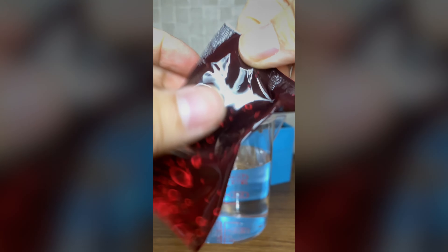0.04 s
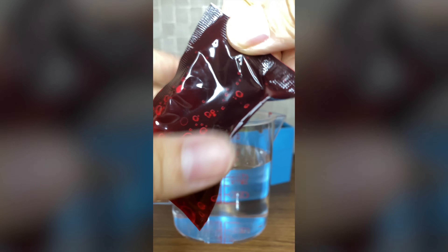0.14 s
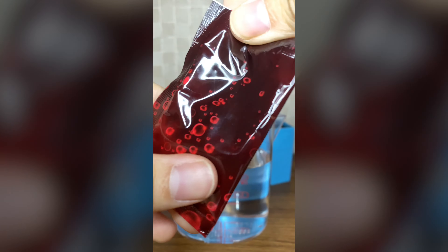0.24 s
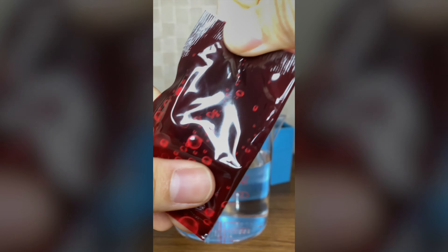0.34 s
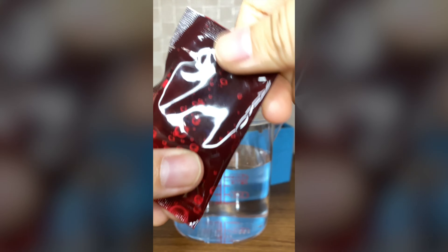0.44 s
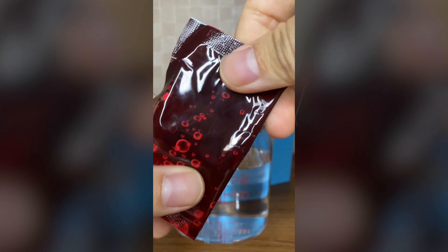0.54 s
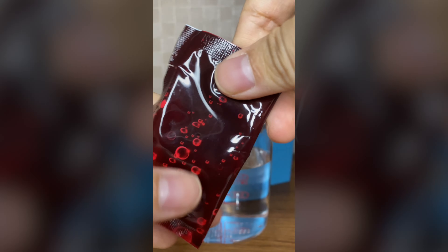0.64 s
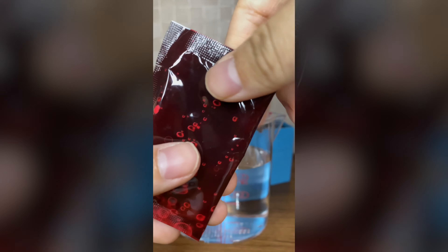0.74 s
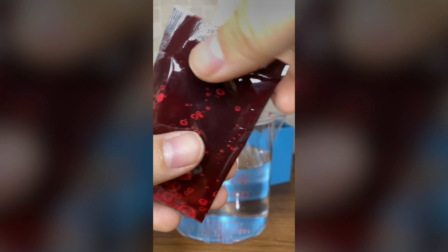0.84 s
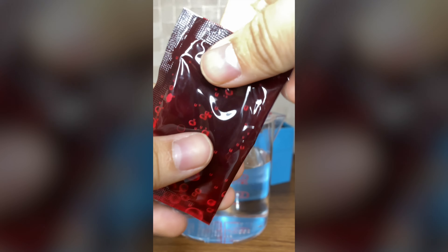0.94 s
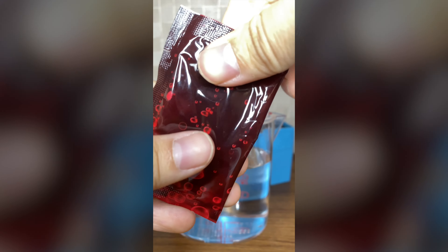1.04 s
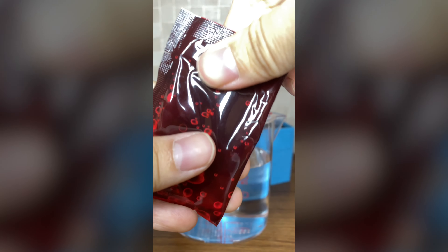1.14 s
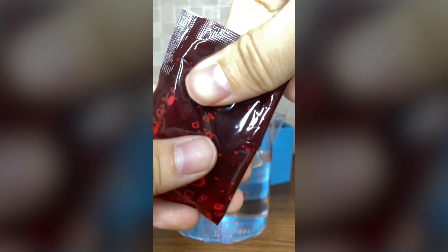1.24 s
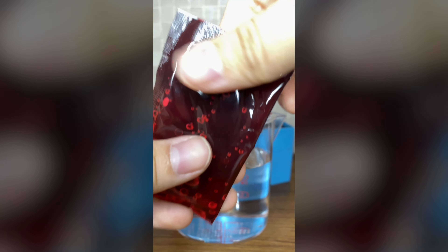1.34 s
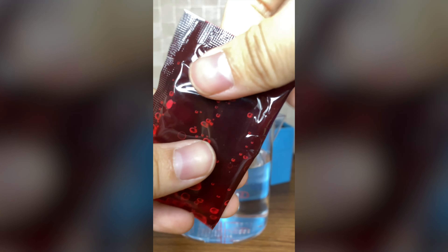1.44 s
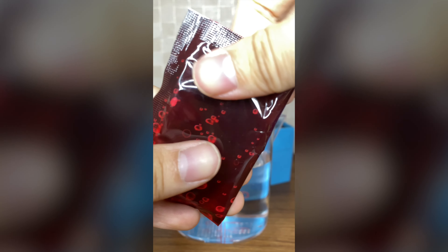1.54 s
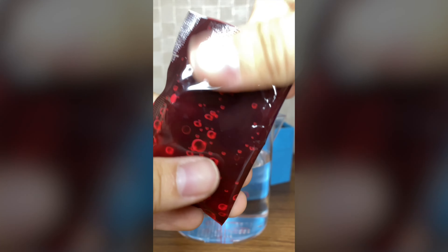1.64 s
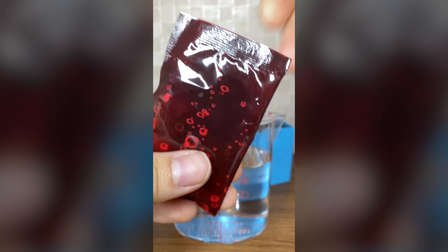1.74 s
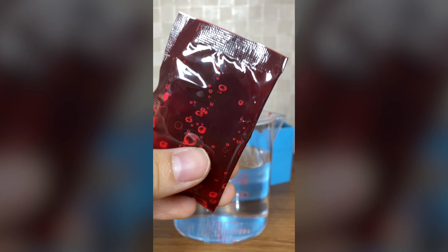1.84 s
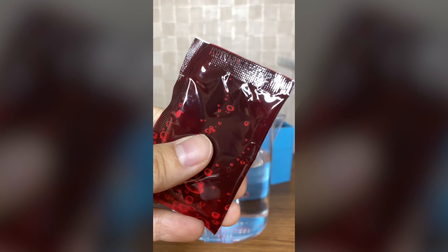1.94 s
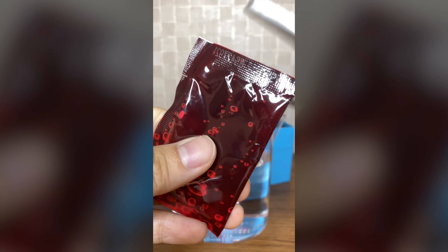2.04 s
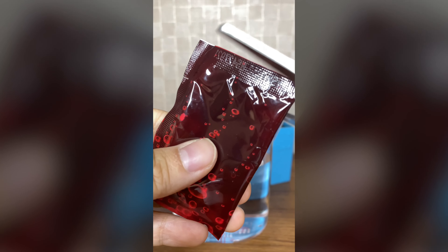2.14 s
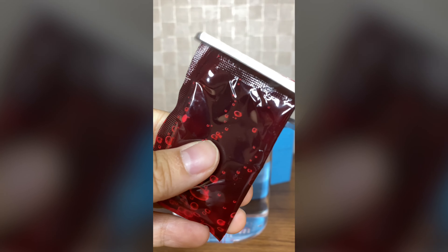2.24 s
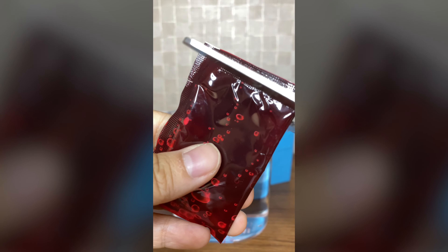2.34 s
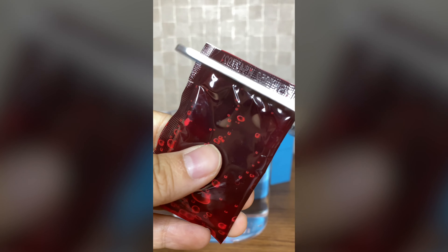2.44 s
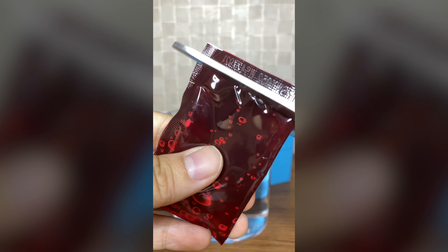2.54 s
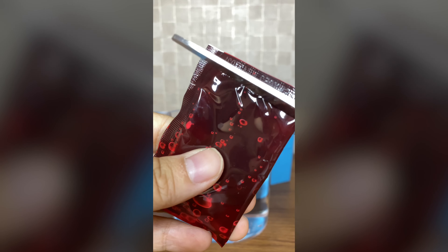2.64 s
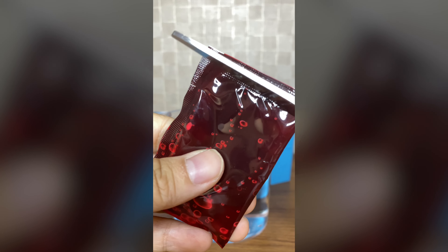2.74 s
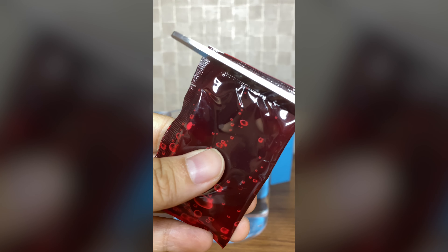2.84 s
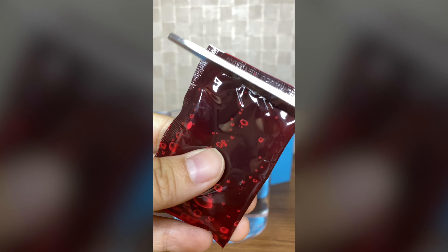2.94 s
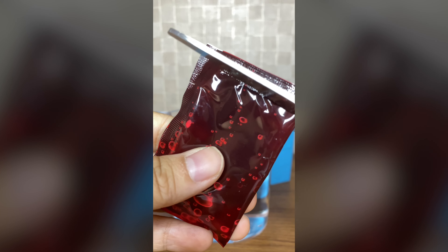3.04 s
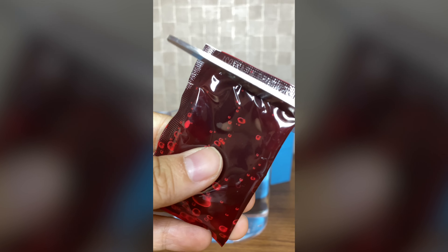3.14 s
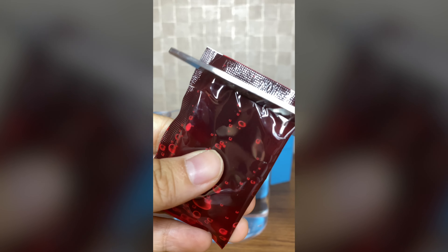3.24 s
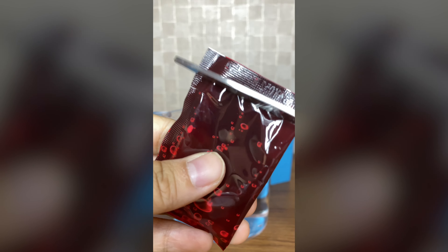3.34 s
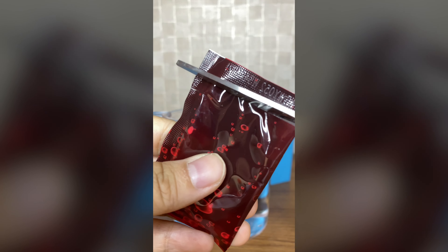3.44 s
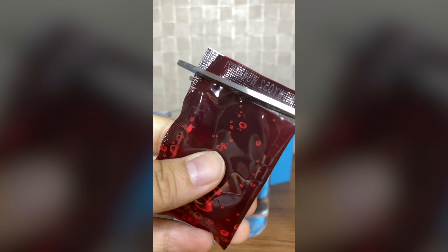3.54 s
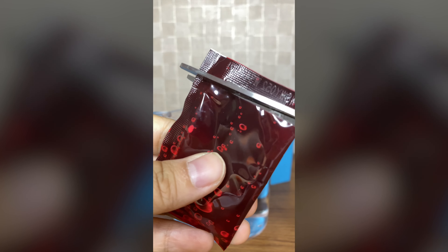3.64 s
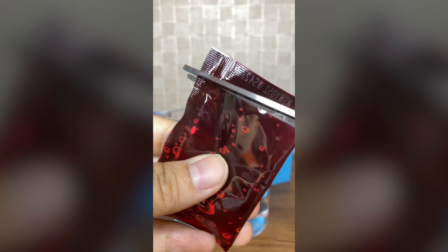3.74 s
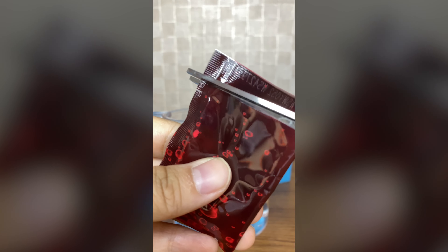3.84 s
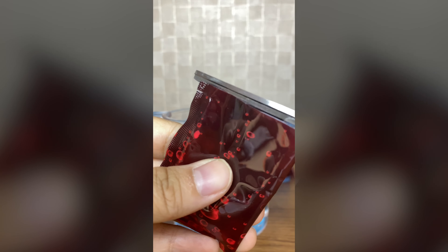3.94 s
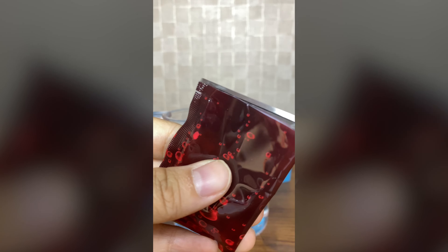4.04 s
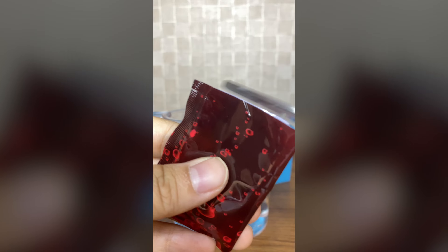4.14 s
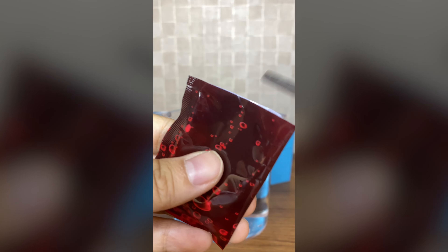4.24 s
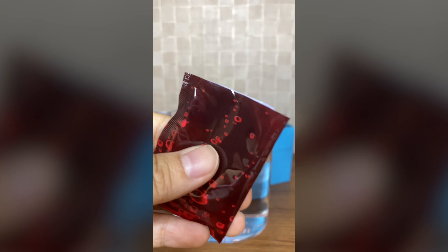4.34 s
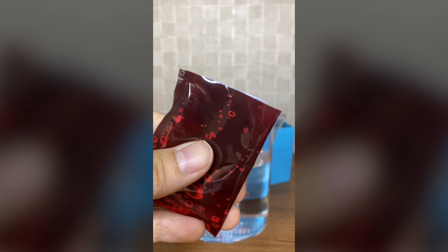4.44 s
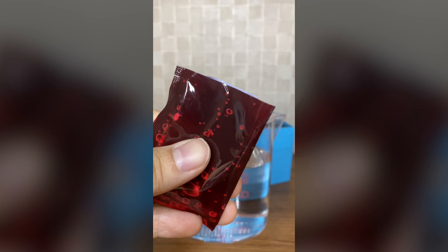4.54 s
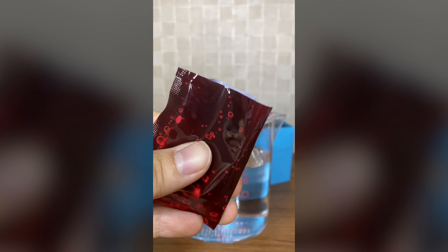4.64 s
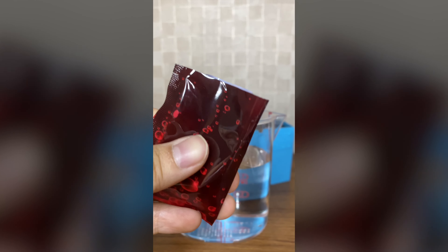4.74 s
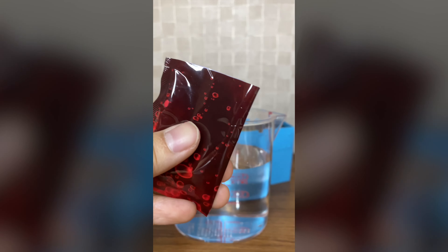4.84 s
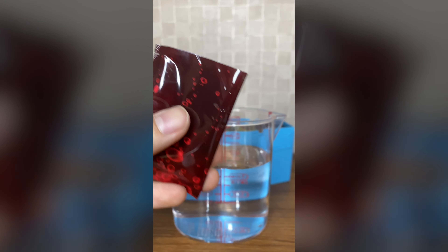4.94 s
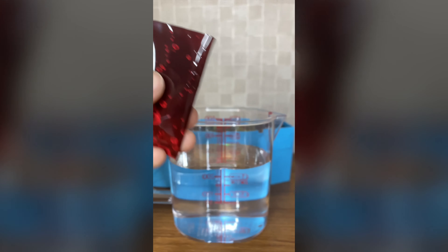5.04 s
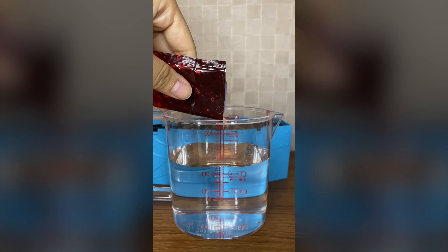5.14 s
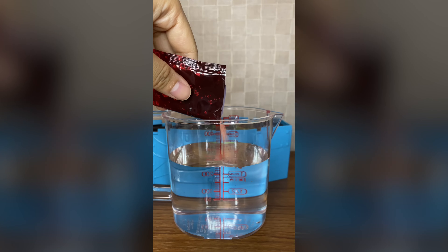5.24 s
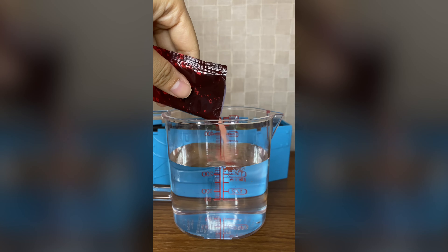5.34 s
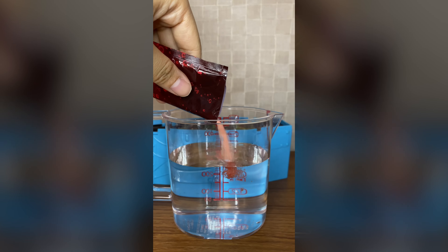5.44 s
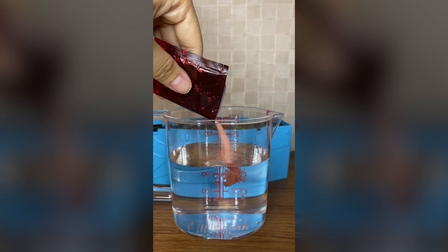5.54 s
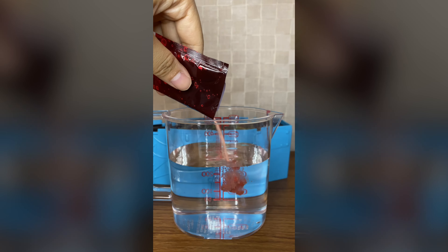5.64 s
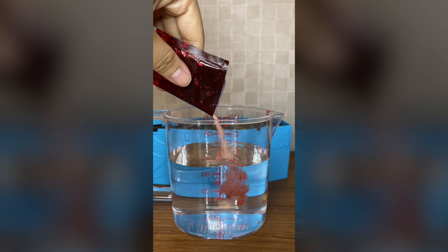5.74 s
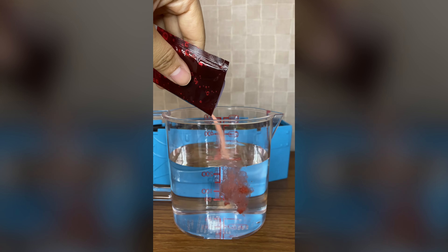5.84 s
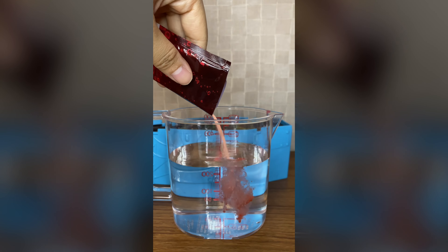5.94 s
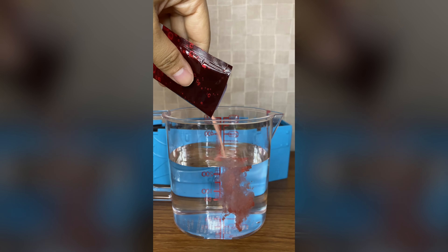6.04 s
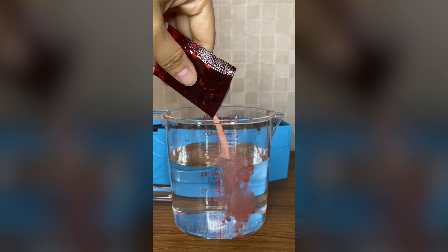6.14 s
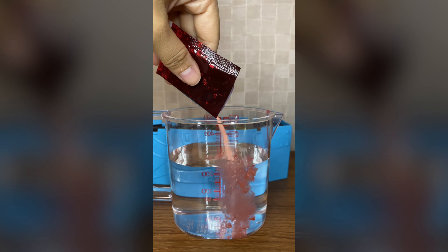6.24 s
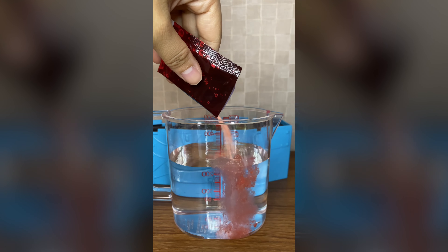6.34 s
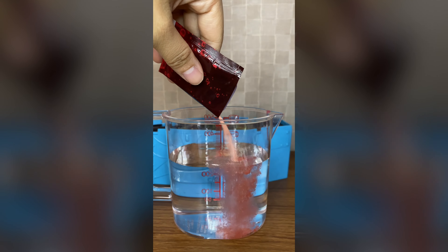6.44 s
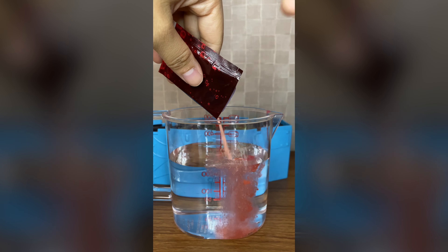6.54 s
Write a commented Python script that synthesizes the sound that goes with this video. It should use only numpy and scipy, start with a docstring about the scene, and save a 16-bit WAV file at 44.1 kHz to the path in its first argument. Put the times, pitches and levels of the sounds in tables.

```python
"""Kneading and cutting a plastic sachet

Fingers knead a plastic sachet close to the microphone, then scissors cut across its top.
The film buckles in sharp snaps, brighter for small facets, made of noise bursts sent through resonances.
Crackles and a rustle of grainy noise follow the effort; the filled pouch thumps as short sinking tones.
Granules run into a beaker of water with a faint hiss, a plop and tiny ringing bubbles, in a small humming room."""
import sys
import numpy as np
from scipy import signal
from scipy.fft import rfft, irfft, next_fast_len
from scipy.io import wavfile

SR = 44100
rng = np.random.default_rng(int(sys.argv[2]) if len(sys.argv) > 2 else 0)


def file_out(sig):
    """Save sig as 16-bit WAV at sys.argv[1]."""
    # one column per channel
    cols = np.atleast_2d(sig).T
    # limit, then scale
    lim = np.clip(cols, -1, 1)
    pcm = np.round(lim * 32767).astype(np.int16)
    wavfile.write(sys.argv[1], SR, pcm)


N = 290619
TIME = np.arange(N) / SR   # s

# the film buckling or giving way under the blades:
# t/s, strength/dB, facet f/Hz, f of the fold around it/Hz, knock on the pouch/dB
# (both dB columns give energy as a level held for 1 ms)
SNAPS = [(0.2334, -5.5, 6200, 4700, -15), (0.2425, -5.5, 4470, 3830, -28.5),
         (0.2575, -5, 5730, 4480, -16.5), (0.2641, -10.5, 5750, 4300, -18), (0.2997, -13, 5000, 1910, -22),
         (0.3728, -15, 5500, 1310, -18), (0.3839, -11.5, 4417, 1530, -17.5),
         (0.3968, -7, 6600, 2730, -10.5), (0.4742, -21.5, 3500, 1910, -22.5),
         (0.4936, -31.5, 1450, 1150, -25), (0.512, -19, 4430, 1850, -30.5), (0.5241, -16, 6450, 3400, -35),
         (0.6072, -11, 5100, 3370, -24), (0.6621, -11.5, 10560, 3430, -30.5),
         (0.8145, -22, 1950, 1150, -17), (0.885, -8.5, 5900, 1920, -22.5), (0.9364, -7, 6100, 4400, -22.5),
         (0.97, -10, 5620, 4050, -30), (1.0116, -30.5, 1430, 1850, -24), (1.0896, -12.5, 4700, 2300, -26.5),
         (1.1812, -21, 6700, 1790, -30.5), (1.2235, -13.5, 7400, 3430, -29.5),
         (1.2788, -8.5, 4500, 3400, -28.5), (1.308, -16.5, 5600, 4500, -24.5),
         (1.3199, -14, 5800, 1910, -14), (1.382, -18, 4400, 1370, -23.5), (1.4666, -11.5, 5600, 1930, -22),
         (1.5563, -11.5, 6400, 1900, -22.5), (1.5853, -22.5, 4500, 1830, -27.5),
         (1.6074, -18, 6720, 1850, -28.5), (1.623, -6, 8070, 3730, -25.5), (1.6606, -26, 2770, 1660, -23),
         (2.635, -53.5, 1995, 1710, -44), (3.146, -54.5, 1860, 1238, -41.5),
         (3.229, -37.5, 2900, 1150, -29), (3.2791, -33.5, 6360, 1750, -33.5),
         (3.3166, -17.5, 10300, 1400, -26), (3.3431, -9, 6680, 1850, -18), (3.3613, -11, 6300, 4500, -20.5),
         (3.4314, -11, 6100, 4540, -29.5), (3.4899, -11.5, 10300, 4210, -25), (3.524, -11, 8900, 1913, -25),
         (3.5618, -20.5, 5660, 1930, -18.5), (3.6593, -14, 2664, 1850, -25.5),
         (3.7002, -19, 4570, 3050, -24), (3.849, -20.5, 5670, 2100, -18.5), (3.919, -13, 8500, 2920, -24),
         (3.95, -31, 3560, 1440, -29), (4.112, -35, 6120, 1970, -26), (4.1339, -24.5, 12200, 1530, -52),
         (4.2157, -26.5, 3520, 1800, -27.5), (4.2974, -45, 1960, 1510, -31.5),
         (4.4694, -13, 5620, 3360, -29), (4.472, -19.5, 5560, 1910, -21), (4.8459, -32, 4540, 2930, -42)]
# how hard the fingers work the film: t/s, rustle level/dB
KNEADING = [(0.13, -69.5), (0.17, -57.5), (0.37, -49.5), (1.054, -56), (1.464, -52), (1.72, -55.5),
            (1.8, -72)]
# how hard the scissors work the film: t/s, rustle level/dB
CUTTING = [(3.118, -69), (3.21, -55.5), (3.386, -52), (3.53, -46.5), (3.934, -55.5), (4.13, -51),
           (4.25, -69), (4.46, -75)]
# granules running into the water: t/s, hiss level/dB before its flutter
POUR = [(5.162, -54.5), (5.35, -57.5), (5.55, -60.5), (5.85, -61.5), (6.05, -58), (6.3, -55), (6.59, -58.5)]


def from_db(db):
    """Decibels to gain."""
    return 10 ** (np.asarray(db) / 20)


def rms_one(x):
    """Scale to rms 1."""
    return x / np.sqrt(np.mean(x ** 2) + 1e-20)


def in_time(rows):
    """Read the columns of a curve at every sample."""
    s, *columns = np.transpose(rows)
    return [np.interp(TIME, s, c) for c in columns]


def at_hz(points, hz):
    """Read a table on a log-frequency axis."""
    f, value = np.transpose(points)
    return np.interp(np.log(np.maximum(hz, 1)), np.log(f), value)


def add(out, s, sound):
    """Mix a sound in at a time in seconds."""
    i = max(int(s * SR), 0)
    out[..., i:i + sound.shape[-1]] += sound[..., :N - i]


def band(x, low_hz, high_hz, order=2):
    """Keep one band of frequencies, without ringing ahead of the sound."""
    edges_hz = [low_hz, min(high_hz, .45 * SR)]
    return signal.sosfilt(signal.butter(order, edges_hz, "band", fs=SR, output="sos"), x)


def boost(x, hz, width_hz, db):
    """Add a resonance that stands db above its surroundings."""
    r = np.exp(-np.pi * width_hz / SR)
    feed = np.array([1, 0, -1]) * (1 - r * r) / 2
    feedback = [1, -2 * r * np.cos(2 * np.pi * hz / SR), r * r]
    ringing = signal.lfilter(feed, feedback, x)
    return x + (from_db(db) - 1) * ringing


def coloured(x, spectrum):
    """Give a steady signal a spectrum that falls away beyond its ends; rms 1."""
    size = next_fast_len(N)
    hz = np.fft.rfftfreq(size, 1 / SR)
    below = 1 + (spectrum[0][0] / (hz + 1)) ** 4
    above = 1 + (hz / spectrum[-1][0]) ** 8
    gain = from_db(at_hz(spectrum, hz)) / np.sqrt(below * above)
    return rms_one(irfft(rfft(x, size) * gain, size)[..., :N])


def drift(rate):
    """Slow random wander of about 1 either way, with rate new targets a second."""
    knots = rng.standard_normal(4096)
    return np.interp(TIME * rate, np.arange(len(knots)), knots)


def grains(per_s, spread_db, smooth):
    """Random tiny contacts of uneven size on a bed of smooth friction noise."""
    sizes = from_db(spread_db * np.minimum(rng.exponential(1, N), 4))
    signed = sizes * rng.choice([-1, 1], N)
    contacts = rms_one(signed * (rng.random(N) < per_s / SR))
    return contacts + smooth * rng.standard_normal(N)


def at_strength(wave, db):
    """Scale short sounds, one per row, to an energy given as a level held for 1 ms."""
    energy = np.sum(wave ** 2, axis=2).mean(axis=1) / (SR / 1000)
    return wave * (from_db(db) / np.sqrt(energy))[:, None, None]


def room_tone(rumble_db=-57.5, hiss_db=-72.5):
    """Low rumble, the wavering hum of an appliance and each microphone's own hiss."""
    # rumble spectrum: f/Hz, level/dB per Hz
    rumble_spectrum = [(30, -1.5), (60, 1), (135, -2), (190, -16), (320, -14.5), (700, -39)]
    # steady tones of the hum: f/Hz, rms level/dB
    hum_tones = [(64.6, -67.5), (140, -68.5), (301, -70.5)]
    # microphone hiss spectrum: f/Hz, level/dB per Hz
    hiss_spectrum = [(600, 5), (5000, -3), (15000, -20.5)]
    mid, side = coloured(rng.standard_normal((2, N)), rumble_spectrum)
    rumble = mid + .2 * side * [[1], [-1]]
    hum = np.zeros(N)
    for hz, db in hum_tones:
        hum += from_db(db) * np.sqrt(2) * np.sin(2 * np.pi * hz * TIME + drift(2.3))
    hiss = coloured(rng.standard_normal((2, N)), hiss_spectrum)
    return from_db(rumble_db) * rumble + hum + from_db(hiss_db) * hiss


def room(x, build_s=0.0045, early_db=1.0, early_s=0.024, size=22050):
    """Close echoes from table and wall, then a diffuse tail that dies band by band."""
    # how strongly the room answers: f/Hz, reverberation level/dB
    room_colour = [(150, -7), (700, -12.5), (4000, -9.5), (16000, -27)]
    # time for the tail to fall by 60 dB: f/Hz, t/s
    room_t60 = [(300, 0.2), (3000, 0.094)]
    t, response = np.arange(size) / SR, 0
    edges_hz = np.geomspace(100, 18000, 9)
    shape = (1 - np.exp(-(t / build_s) ** 2)) * (1 + from_db(early_db) * np.exp(-t / early_s))
    for low, high in zip(edges_hz, edges_hz[1:]):
        hz = np.sqrt(low * high)
        decay = shape * from_db(-60 * t / at_hz(room_t60, hz))
        tail = band(rng.standard_normal((2, size)), low, high) * decay / np.linalg.norm(decay)
        response = response + from_db(at_hz(room_colour, hz)) * tail
    return signal.fftconvolve(x, response, axes=1)[:, :N]


def ports(x):
    """Near sound reaches the two microphone ports with different phase and strength."""
    # how far the left port leads the right: f/Hz, phase/radians
    port_lead = [(900, 0), (1400, .9), (2150, .3), (2650, 1.3), (3100, -.2), (3750, .1), (4100, 2.3),
                 (4600, 2.6), (5200, .6), (7300, 3.2), (10500, 6.3), (16000, 11.4)]
    # how much stronger the left port is than the right: f/Hz, level/dB
    port_balance = [(80, 2), (400, -7.5), (1050, -1.5), (1750, 1.5), (2350, -3), (2800, 5), (3350, -9),
                    (5600, 0)]
    size = next_fast_len(N + 2048)
    hz = np.fft.rfftfreq(size, 1 / SR)
    # each side takes half of the difference
    half = from_db(at_hz(port_balance, hz) / 2) * np.exp(.5j * at_hz(port_lead, hz))
    return irfft(rfft(x, size) * np.array([half, 1 / half]), size)[:, :N]


def pour(flutter_db=2.5):
    """Granules slide out and patter on the water; coarse and fine ones come in separate little gushes."""
    # patter spectrum: f/Hz, level/dB per Hz
    granule_spectrum = [(1000, -22), (2100, -9), (4900, 3.5), (7000, 0.5), (15500, 2.5)]
    level_db, = in_time(POUR)
    patter = coloured(grains(2200, 4.8, 0.35), granule_spectrum)
    # the coarse granules make the part below 7 kHz
    coarse = signal.sosfiltfilt(signal.butter(2, 7000, fs=SR, output="sos"), patter)
    fine = patter - coarse
    gushes = sum(from_db(flutter_db * drift(45)) * part for part in (coarse, fine))
    return (TIME > POUR[0][0]) * from_db(level_db) * gushes


def bubbles(swell_s=0.001314, rise=0.12, shake_db=3.5, size=8192):
    """Air dragged under by the granules rings briefly, rising a little in pitch."""
    # the few clear bubbles: t/s, starting f/Hz, level before swell and shaking/dB, time to fall 60 dB/s
    clear_bubbles = [(5.483, 1827, -59.5, .22), (5.831, 1923, -56, .13)]
    tiny_count, tiny_t60_s = 40, .04
    tiny_hz, tiny_octaves = 1903, 0.74   # middle pitch, spread either way
    tiny_db = -61.5   # the strongest; the others are up to 10 dB weaker
    t, out = np.arange(size) / SR, np.zeros(N)
    when, pitch, weakness = rng.random((tiny_count, 3)).T
    start_s = POUR[0][0]
    times = start_s + when * (TIME[-1] - start_s)
    tiny = [(s, tiny_hz * 2 ** (tiny_octaves * (2 * p - 1)), tiny_db - 10 * w, tiny_t60_s)
            for s, p, w in zip(times, pitch, weakness)]
    for s, hz, db, t60 in list(clear_bubbles) + tiny:
        level = from_db(db - 60 * t / t60) * (1 - np.exp(-t / swell_s))
        add(out, s, level * np.sin(2 * np.pi * hz * t * (1 + rise * t)))
    return out * from_db(shake_db * drift(110))   # the stream keeps jostling them


def clump(rise_s=0.0003, decay_s=0.0028):
    """A clump of granules plops into the water: a short, dull splash of noise."""
    # splash spectrum: f/Hz, level/dB per Hz
    splash_spectrum = [(500, 8.5), (1000, -12), (1750, 3.5), (2700, -17), (5500, -4), (15000, -25)]
    splash_s, splash_db = 5.603, -28
    age = TIME - splash_s
    envelope = np.exp(np.minimum(age / rise_s, -age / decay_s))
    return from_db(splash_db) * envelope * coloured(rng.standard_normal(N), splash_spectrum)


def thumps(swell_cycles=0.44, sag=0.19, size=4096):
    """The filled pouch's wall swings for a few cycles, sinking in pitch as it relaxes."""
    # the pouch flexing: t/s, middle f/Hz, peak level/dB
    flexings = [(0.397, 260, -18.5), (0.4005, 720, -13), (0.76, 101.9, -30), (1.32, 168, -22.5),
                (1.333, 70, -28.5), (3.362, 400, -17.5), (4.472, 313, -26.5), (5.066, 133.2, -35.5),
                (5.094, 139, -40), (6.107, 825, -49.5)]
    t, out = np.arange(size) / SR, np.zeros(N)
    for s, hz, db in flexings:
        age = t * hz / swell_cycles
        # from sag above the middle pitch to sag below it
        sinking_hz = hz * (1 + sag * (2 * np.exp(-age / 2) - 1))
        phase = 2 * np.pi * np.cumsum(sinking_hz) / SR
        add(out, s, from_db(db) * age * np.exp(1 - age) * np.sin(phase))
    return out


def working(size=4410):
    """Strength of the rustle: the effort of the work, and the film creeping around each listed snap."""
    creep_db = -25.5   # rustle relative to the snap
    build_s, settle_s = 0.006, 0.024   # before and after the snap
    out = np.zeros(N)
    for work in (KNEADING, CUTTING):
        at_work = (TIME > work[0][0]) * (TIME < work[-1][0])
        out += from_db(in_time(work)[0]) * at_work
    t = np.arange(-size, size) / SR
    creep = np.exp(np.minimum(t / build_s, -t / settle_s))
    for s, snap_db, *_ in SNAPS:
        add(out, s + t[0], from_db(snap_db + creep_db) * creep)
    return out


def handling(flutter_db=4.0):
    """Worked film rustles, and skin or steel drags over it in tiny slips."""
    # a finger or blade sliding over the film: middle t/s, length/s, dull rub level/dB,
    # bright rustle level/dB (both before the flutter)
    slides = [(0.055, 0.052, -52, -44.5), (0.2, 0.064, -77, -42), (0.236, 0.03, -51.5, -25.5),
              (0.762, 0.058, -43.5, -38), (0.878, 0.0072, -30.5, -33), (1.936, 0.058, -77, -64.5),
              (2.574, 0.04, -64.5, -68.5), (2.693, 0.047, -59.5, -55.5), (2.95, 0.035, -64.5, -62),
              (3.05, 0.017, -62, -61), (4.06, 0.043, -40.5, -45), (4.532, 0.037, -53.5, -55),
              (4.608, 0.069, -57, -49.5), (4.809, 0.1, -74, -56.5), (4.952, 0.026, -52, -54),
              (5.045, 0.04, -42.5, -60), (6.106, 0.02, -58, -55)]
    # dull rub spectrum: f/Hz, level/dB per Hz
    rub_spectrum = [(200, 3), (1000, -7.5), (3000, -12.5)]
    # bright rustle spectrum: f/Hz, level/dB per Hz
    rustle_spectrum = [(1200, -8.5), (1900, -7.5), (5600, 3), (7500, 0), (11000, 1.5), (16000, -4.5)]
    rub_db = -10.5   # dull rub of worked film, relative to its bright rustle
    light_touch_db = -61.5   # a rustle weaker than this loses its top
    bright = working()
    dull = from_db(rub_db) * bright
    for s, length_s, dull_db, bright_db in slides:
        away = (2 * (TIME - s) / length_s) ** 2
        pressure = 1 / (1 + away * away)   # rounded top, soft ends
        dull += from_db(dull_db) * pressure
        bright += from_db(bright_db) * pressure
    rub = dull * coloured(grains(1500, 3.5, .5), rub_spectrum)
    crisp = coloured(grains(700, 6.0, .4), rustle_spectrum)
    soft = signal.sosfiltfilt(signal.butter(1, 6500, fs=SR, output="sos"), crisp)
    firm = bright / (bright + from_db(light_touch_db))
    rustle = bright * (firm * crisp + (1 - firm) * rms_one(soft))
    grip = np.tanh(drift(80))
    return from_db(flutter_db * grip) * (rub + rustle)


def film_body(x, flex):
    """Pass a sound through the pouch's resonances, which shift as the pouch changes shape."""
    # resonances of the pouch and its film: f/Hz before the shift, width/Hz, boost/dB
    film_resonances = [(740, 44, 9.5), (1900, 190, 4.5), (5750, 850, 6.5), (10700, 6200, 3)]
    flex_octaves = 0.09   # shift at flex 1
    for hz, width_hz, db in film_resonances:
        x = boost(x, hz * 2 ** (flex_octaves * flex), width_hz, db)
    return x


def knocks(t, count, lag_cycles=1.5, low_hz=290, high_hz=1100):
    """A kick crosses the pouch as a bending wave: the lows arrive later, so it chirps downwards."""
    hz = np.fft.rfftfreq(len(t), 1 / SR) + 1
    kick = rfft(1.0 * (np.arange(len(t)) == np.argmax(t > 0)))
    waves = []
    for colour, turn, flex, path in rng.uniform(-1, 1, (count, 4)):
        cycles = turn - lag_cycles * (1 + path) * np.log(hz)
        wave = irfft(kick * np.exp(2j * np.pi * cycles), len(t))
        shift = 2 ** (colour / 2)   # up to half an octave either way
        waves.append(film_body(band(wave, low_hz * shift, high_hz * shift, order=3), flex))
    return np.array(waves)[:, None]


def crackles(count=110):
    """Rows like SNAPS for the lesser creases, scattered through the kneading and the cutting."""
    over_rustle_db, spread_db = 13, 3.2
    middle_hz, spread_octaves = 3830, 0.6
    knock_db = -6   # knock on the pouch, relative to the crackle's own strength
    rows = []
    for work in (KNEADING, CUTTING):
        s, work_db = np.transpose(work)
        times = rng.uniform(s[0], s[-1], count // 2)
        strength, pitch, fold = np.clip(rng.standard_normal((3, len(times))), -2, 2)
        db = np.interp(times, s, work_db) + over_rustle_db + spread_db * strength
        facet_hz = middle_hz * 2 ** (spread_octaves * pitch)
        fold_hz = middle_hz * 2 ** (spread_octaves * (fold - 1))
        rows += zip(times, db, facet_hz, fold_hz, db + knock_db)
    return rows


def snaps(rows, crack_s=0.001, tick_s=0.00047, rise_s=0.00018, swell_db=-31, swell_s=0.0034,
          facet_db=8, facet_width=0.049, rebound_s=0.0022, rebound_db=-11,
          spread_db=-9.5, fold_db=6.5, fold_width=0.12, size=3072):
    """A facet flips in a short burst, rebounds and rings with its fold; the pouch knocks."""
    lead_s = .010   # room for the faint swell ahead of the flip
    t = np.arange(size) / SR - lead_s
    times, snap_db, facet_hz, fold_hz, knock_db = np.transpose(rows)
    # small facets ring higher and snap brighter: treble tick over mid crack,
    # 0.5 dB at a 5000 Hz facet and 9 dB more per octave
    bright_db = 0.5 + 9 * np.log2(facet_hz / 5000)
    late, strong, flex = rng.random((len(rows), 3)).T[:, :, None, None]
    bends = 2 * flex.ravel() - 1
    noise = rng.standard_normal((len(rows), 2, size))
    # a crumpled facet radiates a little differently towards each side
    noise = noise[:, :1] + from_db(spread_db) * noise[:, 1:] * [[1], [-1]]
    crack = (1350, 5000, crack_s, snap_db - bright_db / 2)
    tick = (5000, 15800, tick_s, snap_db + bright_db / 2)
    sounds = at_strength(knocks(t + crack_s, len(rows)), knock_db)
    for low_hz, high_hz, decay_s, db in (crack, tick):
        age = t + decay_s / 2
        rebound_age = age - rebound_s * (.5 + late)
        flip = np.exp(np.minimum(age / rise_s, -age / decay_s))
        rebound = np.exp(np.minimum(rebound_age / rise_s, -rebound_age / decay_s))
        # faint noise swelling just before each snap and fading after it
        swell = from_db(swell_db) * np.exp(-np.abs(age) / swell_s)
        envelope = flip + 2 * strong * from_db(rebound_db) * rebound + swell
        rings = []
        for burst, hz, fold, bend in zip(noise * envelope, facet_hz, fold_hz, bends):
            ring = boost(film_body(burst, bend), fold, fold_width * fold, fold_db)
            rings.append(boost(ring, hz, facet_width * hz, facet_db))
        sounds = sounds + at_strength(band(np.array(rings), low_hz, high_hz, order=3), db)
    out = np.zeros((2, N))
    for s, sound in zip(times, sounds):
        add(out, s - lead_s, sound)
    return out


def scene():
    """Sachet and beaker close by, the room behind them."""
    sachet = snaps(SNAPS) + snaps(crackles()) + thumps() + handling()
    near = sachet + pour() + clump() + bubbles()
    return ports(near) + room(near) + room_tone()


def record(dry):
    """Peaks beyond full scale overload and flatten; everything above 16300 Hz is cut."""
    clipped = np.clip(dry, -1, 1)
    return signal.sosfiltfilt(signal.ellip(8, .1, 50, 16300, fs=SR, output="sos"), clipped)


dry = scene()
out = record(dry)
file_out(out)
```